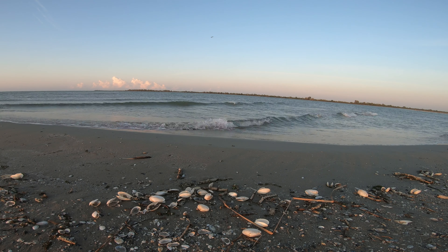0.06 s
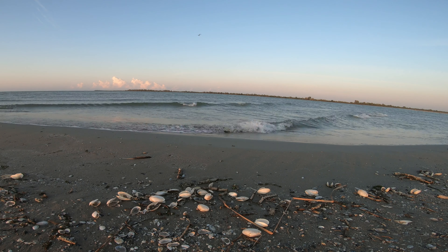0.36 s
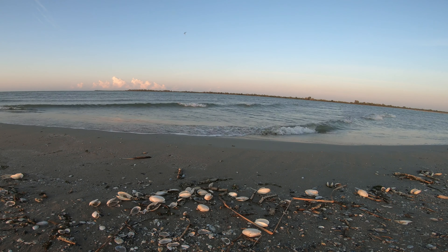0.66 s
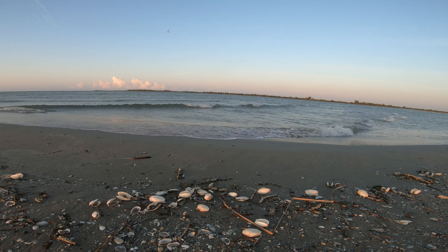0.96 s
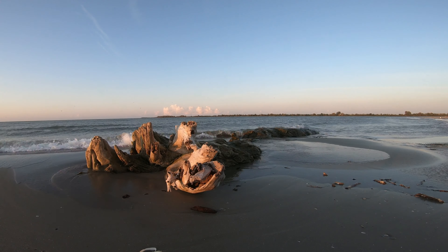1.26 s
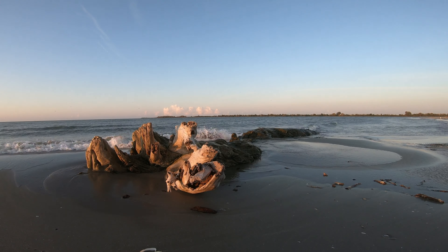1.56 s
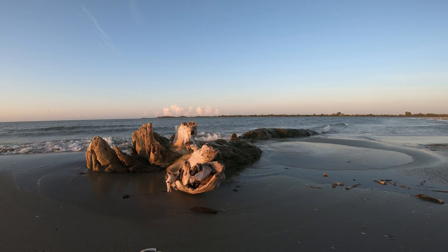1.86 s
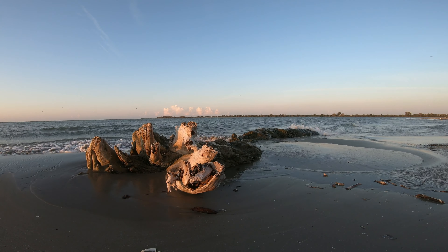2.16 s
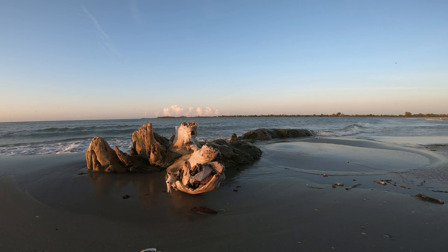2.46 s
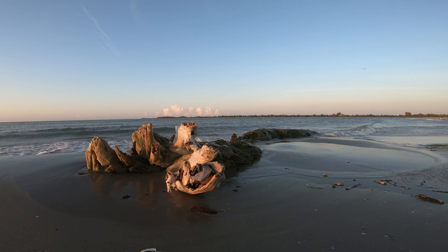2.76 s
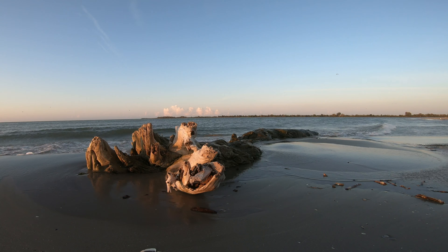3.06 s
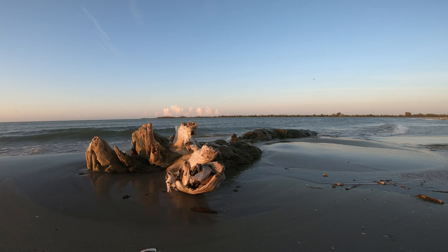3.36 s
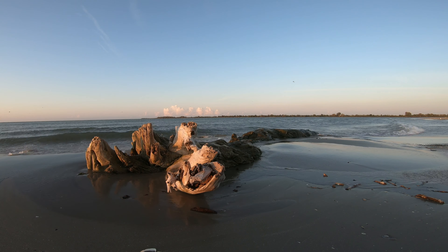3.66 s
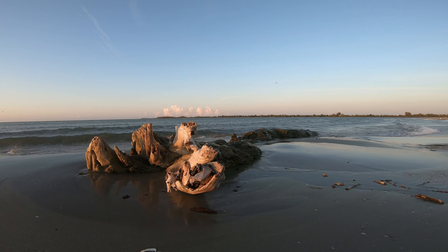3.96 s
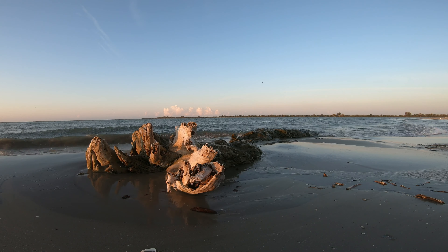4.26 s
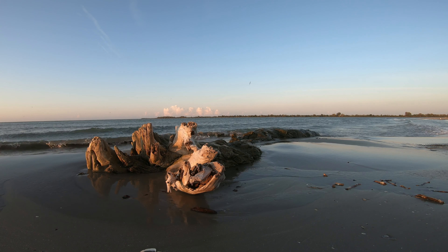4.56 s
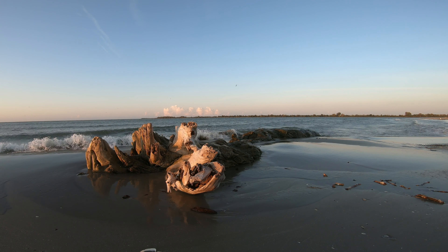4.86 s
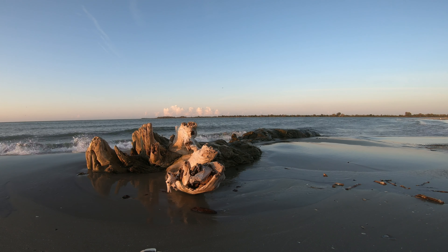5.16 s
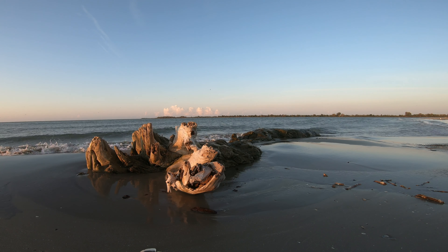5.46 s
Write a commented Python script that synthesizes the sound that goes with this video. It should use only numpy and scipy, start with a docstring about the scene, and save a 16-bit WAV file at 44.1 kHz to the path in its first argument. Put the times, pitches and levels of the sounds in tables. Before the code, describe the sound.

On a sandy shore, low wind flutters right against the microphone, with surf a little farther off. A wave washes in under a few faint bird whistles. After a brief dropout, harder gusts buffet and crackle as the water drains away. The surf then builds again until another small wave breaks, with a soft roar, spray and fizzing foam.

```python
"""On a sandy beach, small waves break and wash up while wind buffets the microphone.
Tumbling water roars, foam bubbles hiss and pop, and the falling crests throw spray.
The wind rumbles, and its eddies (small swirls of air) thump, flutter and slap.
The sound drops out for a moment, then returns with stronger gusts over a draining wave;
a new wave rolls in and breaks. Shore birds whistle faintly now and then."""
import sys
import numpy as np
from scipy import signal
from scipy.fft import rfft, irfft
from scipy.io import wavfile
from scipy.ndimage import uniform_filter1d, minimum_filter1d

SR = 44100
rng = np.random.default_rng(int(sys.argv[2]) if len(sys.argv) > 2 else 0)


def inscribe(sig):
    """Save sig as 16-bit PCM at rate SR to the path in sys.argv[1].

    A 1-D sig is mono; a 2-D sig holds one channel per row.
    Samples are clipped to [-1, 1] before scaling.
    """
    pcm = np.round(np.clip(np.atleast_2d(sig).T, -1, 1) * 32767)
    wavfile.write(sys.argv[1], SR, pcm.astype(np.int16))


N = 247401
TIME = np.arange(N) / SR


def gain_of(db):
    """Turns decibels into a number to multiply a sound by."""
    return 10 ** (np.asarray(db) / 20)


def evened(x):
    """Scales a signal so its average strength (rms) is one."""
    return x / np.sqrt(np.mean(x ** 2) + 1e-20)


def follow(curve):
    """Joins (time, value) points with straight lines."""
    return np.interp(TIME, *np.transpose(curve))


def add(mix, start_s, sound):
    """Mixes a sound in at a given time."""
    part = mix[max(round(start_s * SR), 0):][:len(sound)]
    part += sound[:len(part)]


def coloured(x, tone):
    """Makes each pitch in a signal as strong as a tone table says, then evens the result."""
    pitch_hz, level_db = np.transpose(tone)
    hz = np.fft.rfftfreq(len(x), 1 / SR)
    curve_db = np.interp(np.log(hz + 1), np.log(pitch_hz + 1), level_db)
    return evened(irfft(rfft(x) * gain_of(curve_db), len(x)))


def wander(rate_hz):
    """A smooth random drift, up to about the given rate."""
    hz = np.fft.rfftfreq(N // 32, 32 / SR)
    slow = irfft(rfft(rng.standard_normal(N // 32)) / (1 + (hz / rate_hz) ** 4), N // 32)
    return evened(np.interp(np.arange(N) / 32, np.arange(N // 32), slow))


def bump(centre_s, width_s):
    """A bell-shaped rise and fall around a moment."""
    return np.exp(-np.minimum(((TIME - centre_s) / width_s) ** 2, 20))


# Bird notes: start_s, length_s, level_db, overtone_db, start_hz, middle_hz, end_hz, trill (0 to 1)
BIRD_NOTES = [(0.047, 0.011, -32, -24, 2520, 2600, 2660, 0.1),
              (0.059, 0.012, -35, -24, 2610, 2500, 2440, 0),
              (0.082, 0.012, -33.5, -22, 2500, 2480, 2440, 0),
              (0.096, 0.02, -36.5, -18, 2470, 2400, 2250, .4),
              (0.124, 0.024, -40, -24, 3400, 2900, 2480, .5),
              (0.135, 0.038, -38, -26, 3550, 3670, 3700, 0.5),
              (0.169, 0.01, -32.5, -26, 3670, 3600, 3550, 0), (.178, 0.011, -32, -25, 2720, 2620, 2540, 0),
              (.191, 0.0074, -34, -25, 2670, 2700, 2620, 0),
              (0.202, .011, -31.5, -25, 2610, 2560, 2530, 0.1),
              (2.228, 0.018, -47, -32, 2180, 2200, 2180, 0),
              (3.879, 0.049, -52, -12, 2770, 2990, 2720, 0.2),
              (3.945, 0.028, -50, -5, 2760, 2560, 2380, .45), (3.99, 0.01, -50, 1, 2580, 2500, 2440, 0),
              (3.999, 0.02, -52, -3, 2500, 2380, 2320, .9), (4.029, 0.048, -48.5, -7, 2590, 2480, 2490, .2),
              (4.076, 0.034, -48.5, -7, 2490, 2620, 2640, .1), (4.106, .033, -49, -5, 2650, 2460, 2260, .1)]

def birds(trill_hz=89.5, fade_s=0.0033, waver_db=2):
    """Thin, gliding whistles with an overtone an octave up; some break into a fast trill."""
    out = np.zeros(N)
    for start_s, length_s, level_db, overtone_db, *pitches_hz, trill in BIRD_NOTES:
        progress = np.linspace(0, 1, int(length_s * SR))
        glide_hz = np.polyval(np.polyfit([0, .5, 1], pitches_hz, deg=2), progress)
        phase = 2 * np.pi * np.cumsum(glide_hz) / SR
        whistle = np.sin(phase) + gain_of(overtone_db) * np.sin(2 * phase)
        pulses = evened(1 - trill * np.cos(2 * np.pi * trill_hz * length_s * progress))
        fade = signal.windows.tukey(len(progress), 2 * fade_s / length_s)
        add(out, start_s, gain_of(level_db) * np.sqrt(2) * whistle * pulses * fade)
    return out * gain_of(waver_db * wander(90))


def churn(tone, patchy_db, flicker_db):
    """The noise of countless bubbles, whose clouds swell and fade in patches of pitch and time."""
    real, imag, patches = rng.standard_normal((3, N // 128 + 5, 257))  # grids of time by pitch
    patches = evened(uniform_filter1d(uniform_filter1d(patches, size=14, axis=0), size=5, axis=1))
    grid = (real + 1j * imag) * gain_of(patchy_db * patches)
    noise = signal.istft(grid.T, nperseg=512, noverlap=384)[1][:N]
    return coloured(noise * gain_of(flicker_db * wander(31.5)), tone)


def bubbles(low_hz, high_hz, per_s, decay_cycles, spread_db, pitch_count=30):
    """Single bubbles ring briefly, rising in pitch as they near the surface."""
    out = np.zeros(N)
    for hz in np.geomspace(low_hz, high_hz, pitch_count):
        starts = rng.random(N) < per_s / pitch_count / SR
        strength = gain_of(spread_db * np.minimum(rng.exponential(1, N), 4))
        age = np.arange(int(5 * decay_cycles * SR / hz)) * hz / SR / decay_cycles
        ring = np.exp(-age) * np.sin(2 * np.pi * decay_cycles * (age + 0.019 * age ** 2))
        out += signal.oaconvolve(strength * starts, ring * np.sqrt(hz))[:N]
    return evened(out)


# Breaking waves: start_s, rise_s, hold_s, sag_db_per_s (below zero it grows), roar_db, foam_db, spray_db
WAVES = [(-.3, 0.38, 1.1, 8, -30.5, -32.5, -50), (1.118, 0.19, 0.25, -3, -33, -40.5, -53),
         (2.878, 0.83, 1.2, 6, -36, -46.5, -68), (3.698, 0.19, .7, -6.5, -60, -47, -62),
         (4.58, 0.22, .9, 3, -27.5, -32.5, -46), (5.19, 0.037, 0.09, 12, -25, -38, -52)]

def wave_level(part, calm_db, drain_db_per_s, lag_s=0):
    """How loud one part of the surf is: each wave rises, runs up the sand, then drains away."""
    column = ("roar", "foam", "spray").index(part)
    power = gain_of(calm_db) ** 2
    for start_s, rise_s, hold_s, sag_db_per_s, *levels_db in WAVES:
        age_s = TIME - start_s
        sag_db = sag_db_per_s * np.clip(age_s - rise_s, 0, hold_s)
        drain_db = drain_db_per_s * np.maximum(age_s - rise_s - hold_s, 0)
        build_s = rise_s + min(lag_s, 2 * rise_s)  # a quick plunge leaves little time to lag
        level = np.clip(age_s / build_s, 0, 1) * gain_of(levels_db[column] - sag_db - drain_db)
        power = power + level ** 2
    return np.sqrt(power)


# Splashes of a falling crest: centre_s, width_s, level_db
SPLASHES = [(2.596, 0.04, -63.5), (2.78, .025, -64), (4.705, 0.032, -49), (4.757, 0.018, -41),
            (4.83, 0.025, -45.5), (4.97, .08, -49.5), (5.315, .05, -49)]

def splash_level():
    """Falling water briefly stirs up extra foam and spray."""
    return sum(gain_of(level_db) * bump(centre_s, width_s) for centre_s, width_s, level_db in SPLASHES)


# Tone of tumbling water: pitch_hz, level_db
ROAR_TONE = [(60, 3), (200, -4.5), (330, -1), (480, 1.5), (750, 0), (1200, -1.5), (2000, -8), (3500, -22.5),
             (7000, -57.5)]

def roar():
    """The crest tumbles over with a low roar that builds later than the foam."""
    level = wave_level("roar", calm_db=-51, drain_db_per_s=35, lag_s=0.26)
    return level * churn(ROAR_TONE, patchy_db=0.5, flicker_db=0.56)


# Tone of washing foam: pitch_hz, level_db
FOAM_TONE = [(200, -27.5), (600, -9.5), (1100, 1.5), (1600, 1.5), (2400, 0.5), (3200, -2), (4100, -7),
             (5000, -12.5), (6000, -33.5), (9000, -31.5), (11500, -38.5), (13000, -54)]

def foam():
    """Foam washes over the sand while single bubbles pop in it."""
    wash = churn(FOAM_TONE, patchy_db=0.7, flicker_db=0.87)
    pops = gain_of(-16) * bubbles(900, 4200, per_s=600, decay_cycles=8.7, spread_db=2.0)
    level = wave_level("foam", calm_db=-50, drain_db_per_s=23.5)
    return np.hypot(level, gain_of(9.5) * splash_level()) * (wash + pops)


# Tone of flying spray: pitch_hz, level_db
SPRAY_TONE = [(1500, -20), (3500, -13.5), (4900, 5.5), (5600, 3), (6900, 0.5), (7600, -6.5), (8100, -5.5),
              (9000, -12), (10800, -11), (11600, -26.5), (13000, -37)]

def spray():
    """The breaking crest throws hissing spray, and tiny bubbles fizz."""
    hiss = churn(SPRAY_TONE, patchy_db=1.0, flicker_db=0.77)
    fizz = gain_of(-13) * bubbles(3500, 8000, per_s=410, decay_cycles=3, spread_db=4.5)
    level = wave_level("spray", calm_db=-67.5, drain_db_per_s=34)
    return np.hypot(level, splash_level()) * hiss + level * fizz


# Strength of the breeze between eddies: time_s, level_db
BREEZE = [(0, -22), (.3, -25), (.45, -26), (.54, -30.5), (.65, -26.5), (.75, -24.5), (.85, -23),
          (1.03, -22), (1.3, -31.5), (1.5, -24), (1.78, -30.5), (2.35, -25.5), (2.42, -29), (2.49, -33),
          (2.6, -28), (2.8, -28.5), (2.95, -30), (3.15, -26), (3.3, -31), (3.52, -27.5), (3.72, -29.5),
          (3.85, -25), (4, -24.5), (4.2, -25.5), (4.36, -26), (4.54, -26), (4.7, -23.5), (5, -23.5),
          (5.27, -24), (5.34, -35), (5.45, -27), (5.6, -24.5)]
# Strength of fine turbulence (choppy air) compared with the rumble: time_s, level_db
TURBULENCE_SHARE = [(0, -10), (1.4, -9), (2.7, -12.5), (3.4, -11), (3.9, -21), (4.4, -15.5), (4.95, -10.5),
                    (5.6, -6.5)]
# Tones of the rumble, the turbulence and the heave (very deep pressure swings): pitch_hz, level_db
RUMBLE_TONE = [(8, -7.5), (25, -1.5), (45, 4), (80, 3), (115, 0), (160, -7.5), (240, -19.5), (400, -28),
               (800, -61), (2000, -82)]
TURBULENCE_TONE = [(60, -22), (130, -2.5), (190, 1), (280, -9.5), (420, -13), (900, -26), (3000, -59.5),
                   (8000, -85.5)]
HEAVE_TONE = [(10, -13), (24, -1), (42, 1), (65, -13.5), (130, -44.5), (400, -89)]

def wind(gusty_db=1.2, gusty_hz=6.1):
    """Lumps of air pressure roll over the microphone and swell to a thump with each eddy."""
    rumble = coloured(rng.standard_normal(N), RUMBLE_TONE)
    strength = np.sqrt(uniform_filter1d(rumble ** 2, size=3500) + 1e-6)
    rumble = evened(rumble / strength ** (3 / 4))  # wind speed, more than chance, sizes the lumps
    turbulence = coloured(abs(rumble) * rng.standard_normal(N), TURBULENCE_TONE)
    breeze = gain_of(follow(BREEZE) + gusty_db * wander(gusty_hz))
    thumps = thump_power()
    level = np.sqrt(breeze ** 2 + thumps)
    # the strongest eddies also heave deeply
    heave = gain_of(6.5) * thumps * coloured(rng.standard_normal(N), HEAVE_TONE)
    return level * (rumble + gain_of(follow(TURBULENCE_SHARE)) * turbulence) + heave


# Eddies hitting the microphone: peak_s, width_s, thump_db, flutter_db, fade_above_hz
EDDIES = [(0.15, 0.014, -36, -21.5, 420), (0.235, 0.013, -22, -31, 350), (0.328, 0.02, -22, -38, 400),
          (0.357, 0.012, -22, -27, 420), (0.402, 0.031, -21, -35, 380), (0.458, 0.015, -17, -39, 300),
          (0.65, 0.03, -22.5, -43, 300), (0.743, .01, -28, -24.5, 400), (0.84, 0.013, -23, -36, 300),
          (0.975, 0.02, -30, -25.5, 400), (1.425, 0.01, -21, -33.5, 499),
          (1.473, 0.039, -17.5, -20.5, 1260), (1.53, 0.024, -14.5, -29, 1030), (1.63, 0.049, -20, -24, 640),
          (1.7, 0.022, -19, -21, 650), (1.883, 0.036, -16, -30, 865), (1.911, 0.01, -16.5, -17, 1900),
          (1.972, 0.034, -19.5, -23, 645), (2.016, 0.026, -13.5, -28, 1200), (2.11, 0.014, -15.5, -30, 450),
          (2.177, 0.012, -17, -27, 930), (2.203, 0.015, -14, -16, 3100), (2.242, 0.018, -34, -23.5, 700),
          (2.279, 0.021, -18, -26, 750), (2.367, 0.0086, -24, -35, 450), (2.421, 0.005, -31, -38, 300),
          (2.683, 0.0035, -21.5, -29.5, 500), (2.731, 0.015, -27, -25.5, 600),
          (2.832, 0.024, -21, -25.5, 720), (2.888, 0.014, -21, -40, 450), (3.012, 0.015, -23.5, -29.5, 360),
          (3.047, .015, -30, -29, 360), (3.19, 0.016, -21.5, -28.5, 500), (3.27, 0.0063, -24.5, -40, 300),
          (3.375, 0.018, -27, -33, 380), (3.415, 0.023, -22.5, -32, 380), (3.65, 0.027, -24.5, -32.5, 320),
          (3.775, .016, -23, -37, 300), (3.895, 0.021, -20.5, -36, 300), (4.05, 0.024, -22.5, -34, 400),
          (4.125, 0.013, -20, -41, 300), (4.182, 0.0075, -25, -43, 300), (4.314, 0.012, -21, -30, 300),
          (4.415, 0.023, -23.5, -39, 300), (4.52, 0.012, -22, -36, 300), (4.566, 0.0077, -22, -38, 304),
          (4.605, 0.017, -21.5, -31.5, 300), (4.638, 0.014, -23, -28, 550), (4.775, 0.022, -27.5, -32, 306),
          (4.895, 0.014, -28, -24, 300), (4.961, 0.018, -19.5, -25.5, 300), (5.03, 0.02, -23.5, -31, 300),
          (5.418, 0.0078, -16, -27, 394), (5.492, 0.013, -25, -29, 830), (5.54, 0.019, -24, -26, 260),
          (5.596, .012, -23, -24.5, 350)]

def eddies(low_hz=115, ragged_db=2.0, front_share=0.63):
    """Each eddy is a ragged flutter with a quick front; faster ones break up and reach higher pitches."""
    out, t = np.zeros(N), np.arange(-4096, 4096) / SR
    hz = np.fft.rfftfreq(len(t), 1 / SR)
    for peak_s, width_s, _, flutter_db, fade_above_hz in EDDIES:
        noise, lumps = rng.standard_normal((2, len(t)))
        shape = np.exp(-2 * (t / np.where(t < 0, front_share * width_s, width_s)) ** 2)
        ragged = gain_of(ragged_db * evened(uniform_filter1d(lumps, size=180)))
        burst = rfft(noise * shape * ragged)
        # whirls of all sizes share the energy
        burst /= np.sqrt(uniform_filter1d(abs(burst) ** 2, size=55) + 1e-12)
        bass_hump = hz ** 2 / (hz ** 2 + low_hz ** 2) / (hz + low_hz) ** 1.39
        treble_cut = np.sqrt(1 + (hz / fade_above_hz) ** 5.3) * (1 + (hz / 4300) ** 6)
        puff = evened(irfft(burst * bass_hump / treble_cut)) * np.sqrt(np.mean(shape ** 2))
        add(out, peak_s + t[0], gain_of(flutter_db) * puff)
    return out


def thump_power(spread_s=0.012):
    """The power eddies add to the rumble; each low thump outlasts its flutter a little."""
    return sum((gain_of(thump_db) * bump(peak_s, width_s + spread_s)) ** 2
               for peak_s, width_s, thump_db, *_ in EDDIES)


# Gust fronts slapping the microphone: start_s, push_s, push_db, crackle_db
SLAPS = [(0.971, 0.0034, -11.5, -43), (1.531, 0.0017, -22, -29), (1.617, 0.0017, -14.5, -34.5),
         (1.729, 0.0017, -19, -31), (1.837, 0.0019, -17, -31), (1.847, 0.0035, -12, -30),
         (1.874, 0.0011, -18, -26), (1.902, 0.0017, -16, -27), (1.909, 0.0029, -9.5, -17.5),
         (1.952, 0.0019, -15.5, -31), (1.971, .0028, -11, -31), (1.99, 0.00093, -25, -26),
         (1.997, 0.0021, -11, -24.5), (2.011, 0.0014, -17, -25), (2.019, 0.0032, -14, -32),
         (2.109, 0.0013, -24, -47), (2.122, 0.0038, -10, -45), (2.162, 0.0013, -18, -28),
         (2.167, 0.003, -8, -29), (2.175, 0.0013, -18, -21), (2.206, 0.0017, -10.5, -16.5),
         (2.212, .0016, -18, -24), (2.262, 0.0011, -21, -29.5), (2.295, .0015, -23, -36),
         (2.366, 0.0021, -18.5, -42), (2.59, 0.0039, -16.5, -43), (2.675, 0.0057, -15.5, -46),
         (2.728, 0.0028, -16, -40), (2.825, 0.0053, -10, -44), (2.876, 0.0017, -22.5, -42),
         (3.123, 0.0029, -10.5, -48), (3.175, 0.0026, -24, -33), (3.191, 0.0018, -17.5, -38),
         (5.489, 0.00068, -16, -21)]
# Tone of the crackle behind a front: pitch_hz, level_db
CRACKLE_TONE = [(200, -12), (600, 10), (1000, 1), (1600, -2), (2200, -11.5), (3500, -22), (5000, -29),
                (9000, -67)]

def slaps(crackle_decay_s=0.0053, top_hz=3400):
    """A steep gust front gives one sharp push and a longer suck, and tears into a short crackle."""
    out, t = np.zeros(N), np.arange(2048) / SR
    for start_s, push_s, push_db, crackle_db in SLAPS:
        age = 2 * t / push_s  # the push turns into a suck at age 2
        pulse = age * (2 - age) * np.exp(-age)
        noise = coloured(rng.standard_normal(len(t)), CRACKLE_TONE)
        crackle = noise * np.exp(-t / crackle_decay_s) * (1 - np.exp(-2 * age))
        add(out, start_s, gain_of(push_db) * pulse / pulse.max() + gain_of(crackle_db) * crackle)
    return signal.sosfilt(signal.butter(4, top_hz, fs=SR, output="sos"), out)


def scene():
    """Surf and birds farther off, wind right on the microphone, in one channel."""
    surf = roar() + foam() + spray()
    return (surf + birds() + wind() + eddies() + slaps())[None]


def record(dry, ceiling=0.5, stop_s=1.029, return_s=1.211, full_s=1.288, top_hz=12900):
    """A limiter turns down the biggest gusts, the sound stops and fades back, and top treble is cut."""
    needed_gain = ceiling / np.maximum(abs(dry[0]), ceiling)
    limiter = uniform_filter1d(minimum_filter1d(needed_gain, size=600), size=600)
    cut_out = np.clip((stop_s - TIME) * 1000, 0, 1)
    fade_in = np.clip((TIME - return_s) / (full_s - return_s), 0, 1) ** 2
    treble_filter = signal.firwin(511, top_hz, window=("kaiser", 9), fs=SR)
    return signal.oaconvolve(dry * limiter * (cut_out + fade_in), treble_filter[None], "same")


dry = scene()
out = record(dry)
inscribe(out)
```